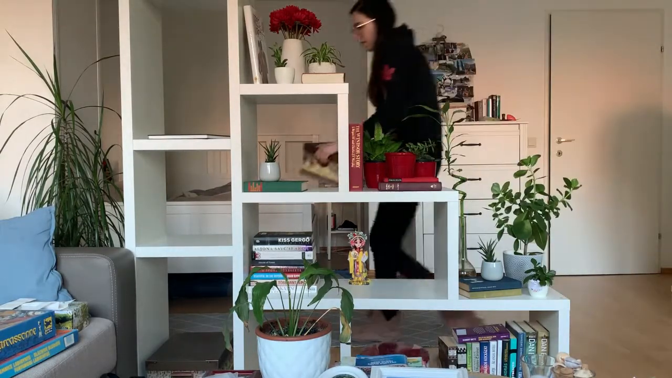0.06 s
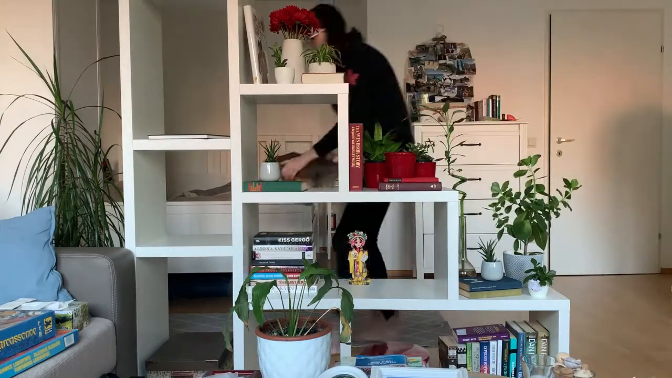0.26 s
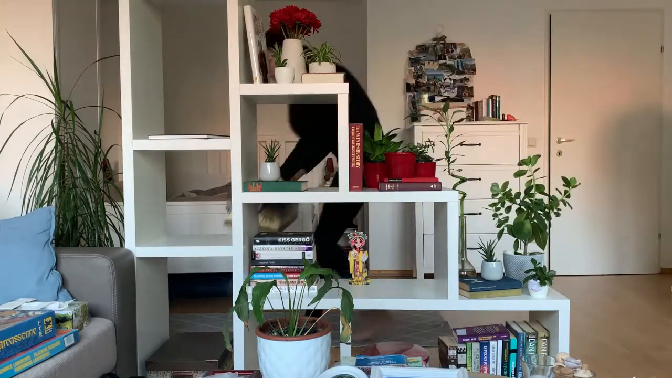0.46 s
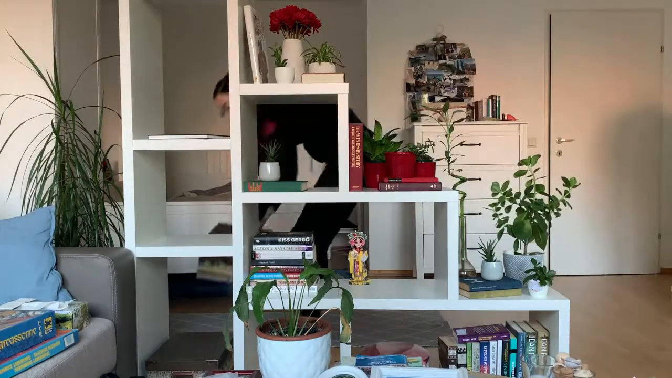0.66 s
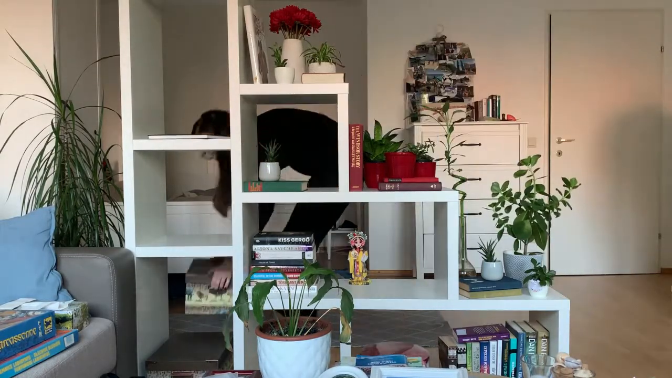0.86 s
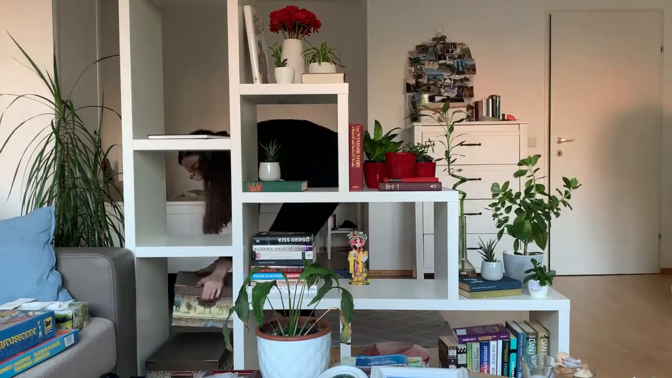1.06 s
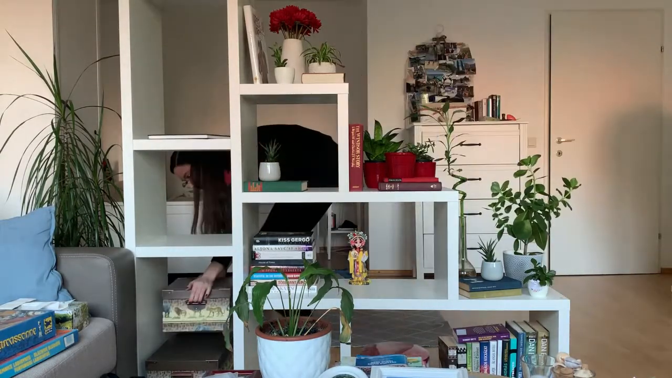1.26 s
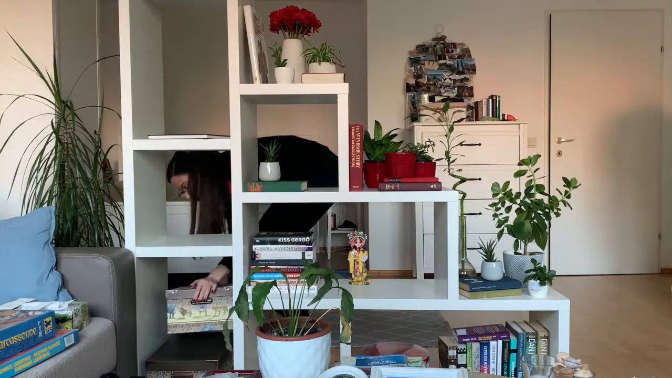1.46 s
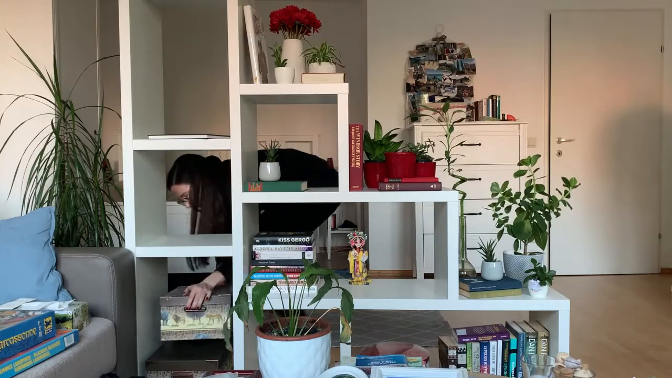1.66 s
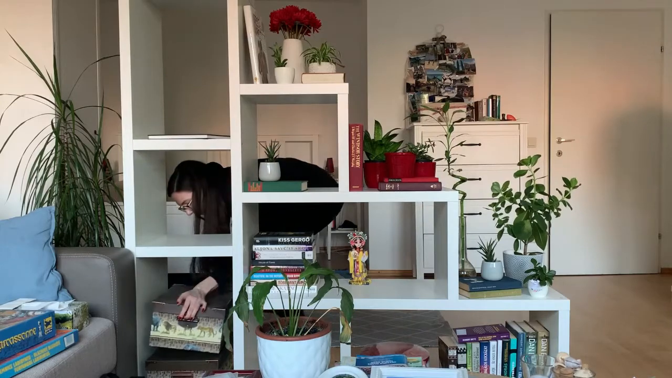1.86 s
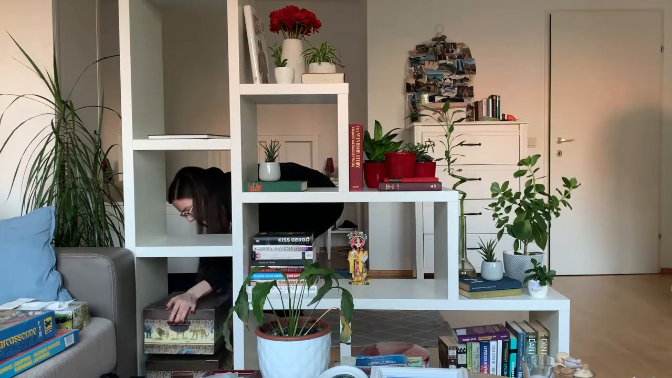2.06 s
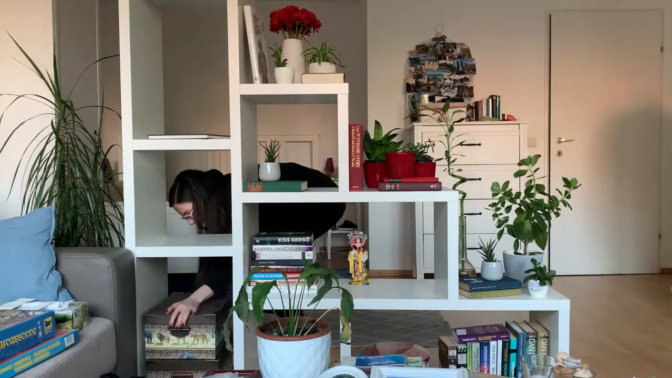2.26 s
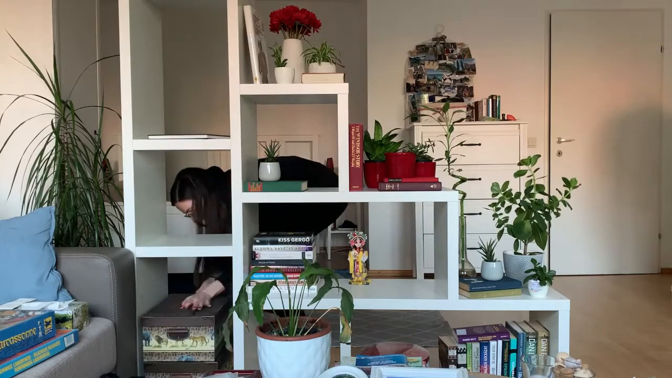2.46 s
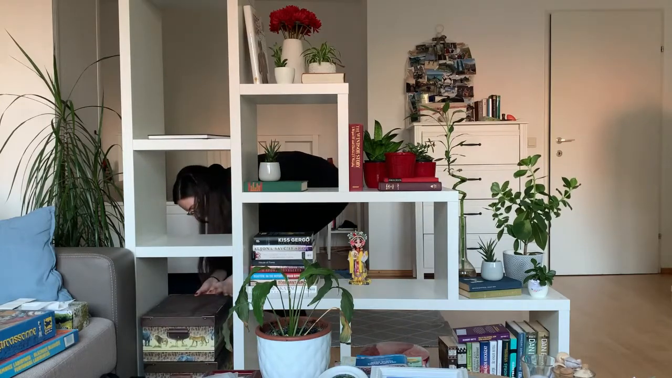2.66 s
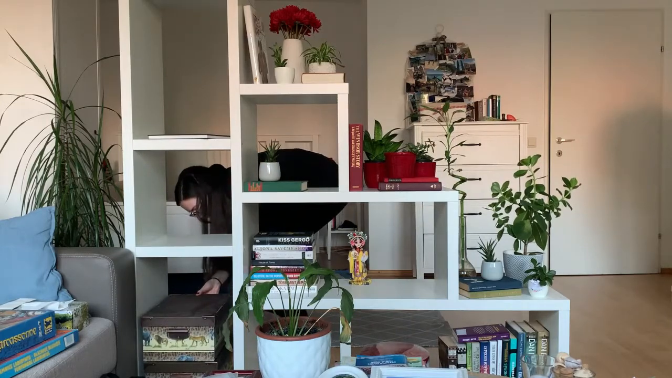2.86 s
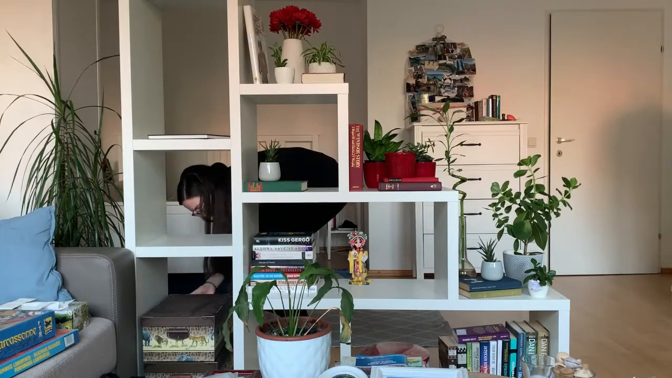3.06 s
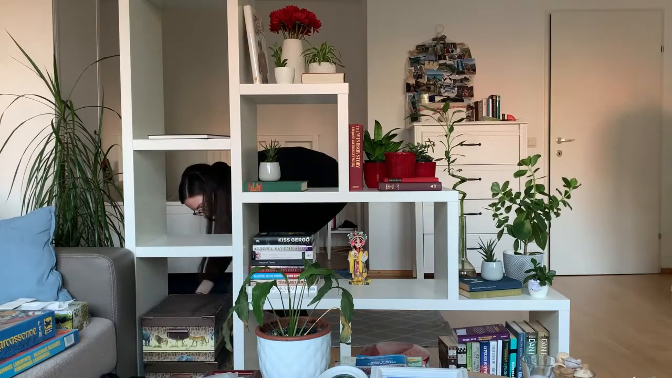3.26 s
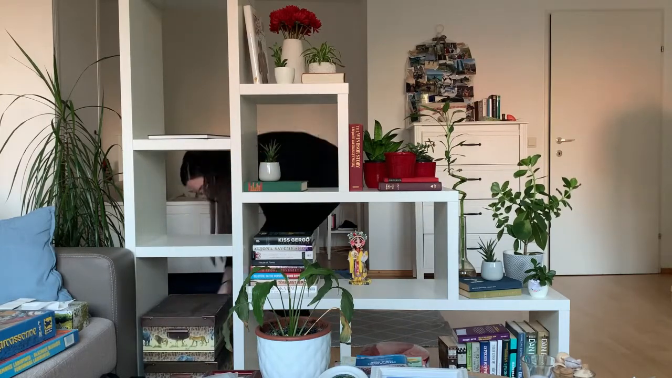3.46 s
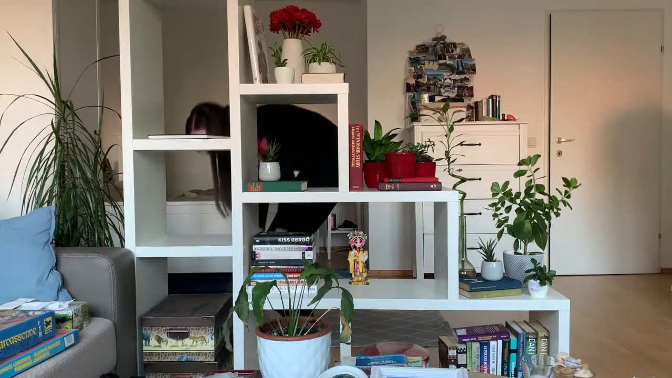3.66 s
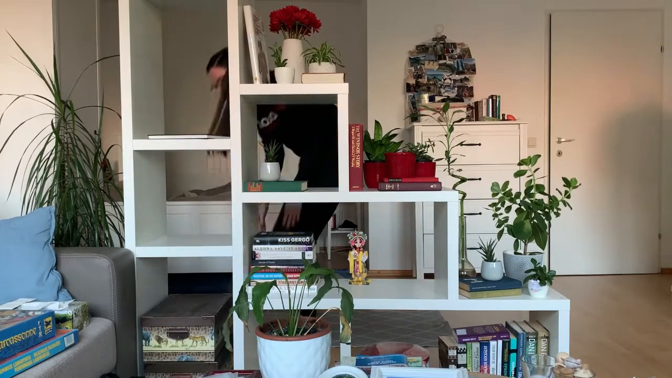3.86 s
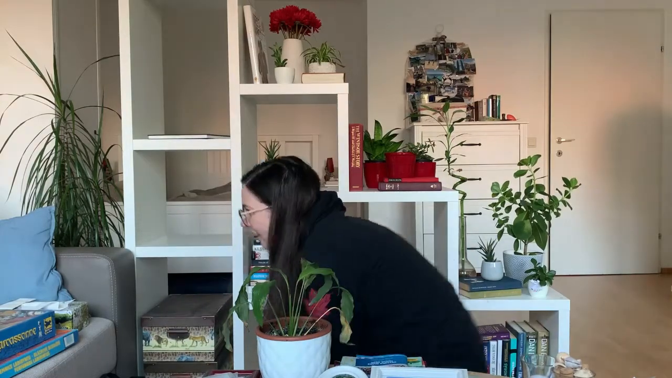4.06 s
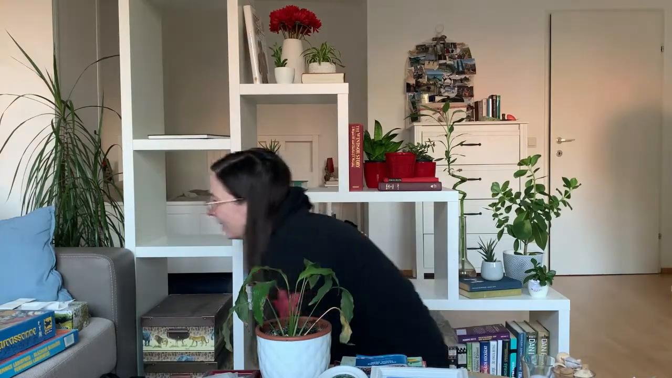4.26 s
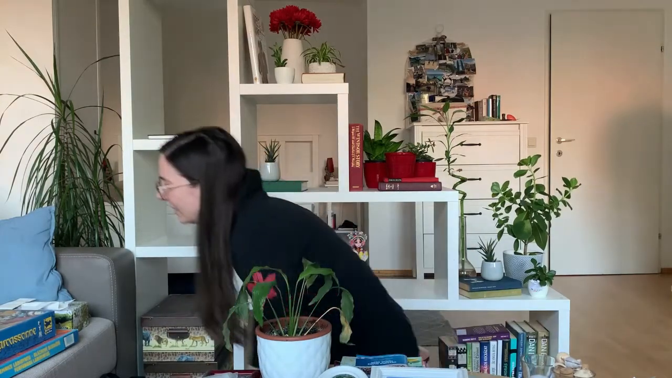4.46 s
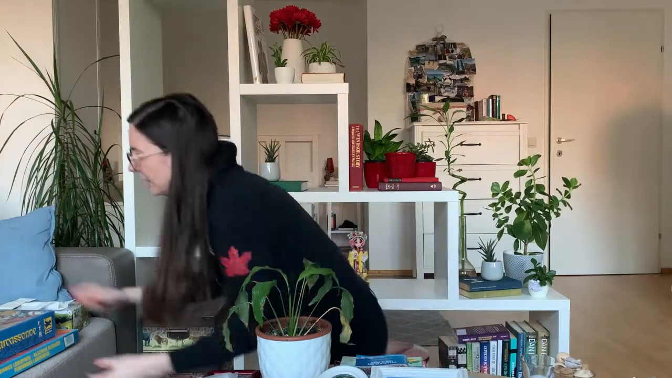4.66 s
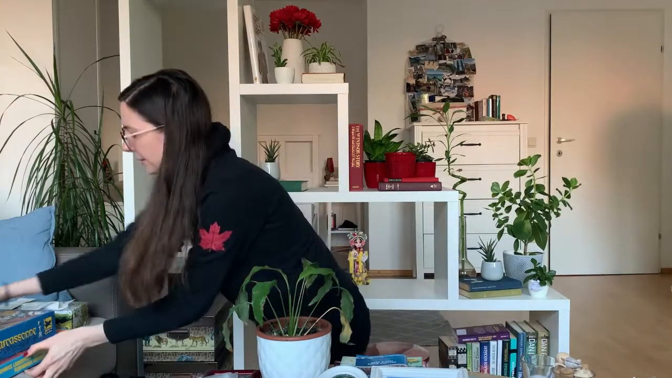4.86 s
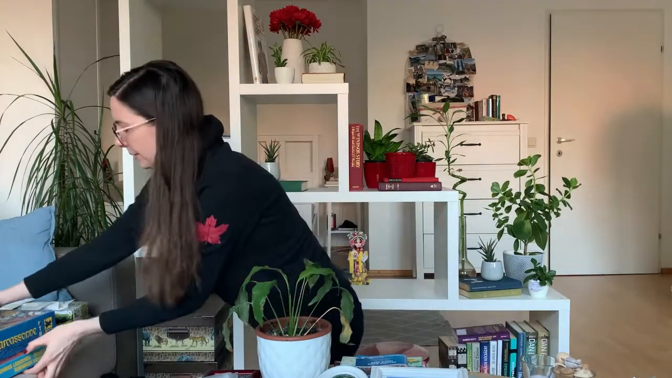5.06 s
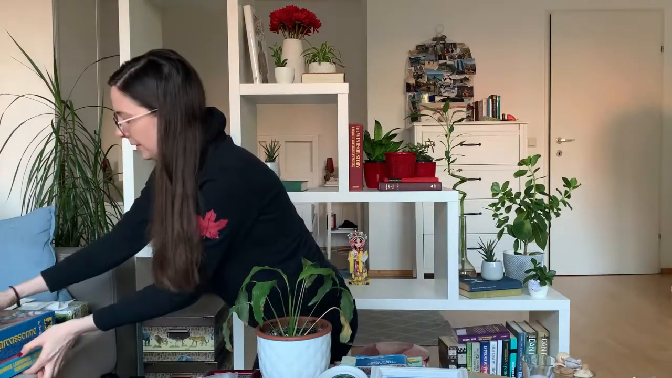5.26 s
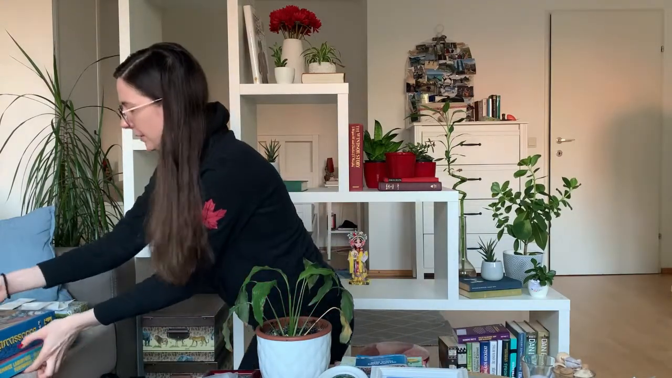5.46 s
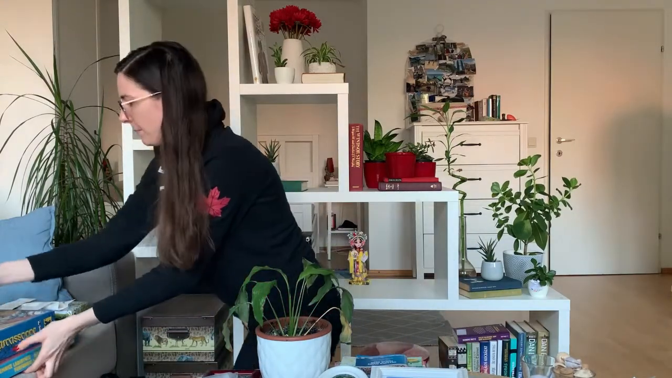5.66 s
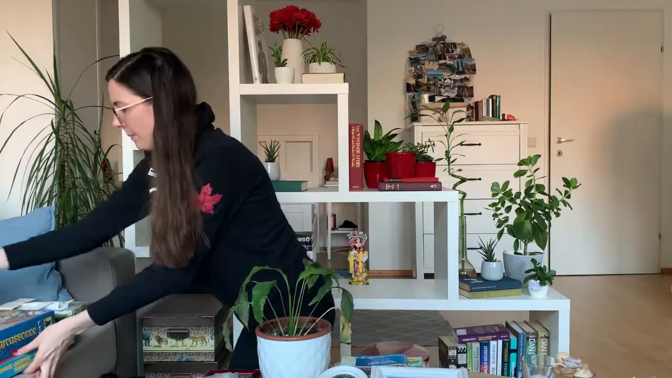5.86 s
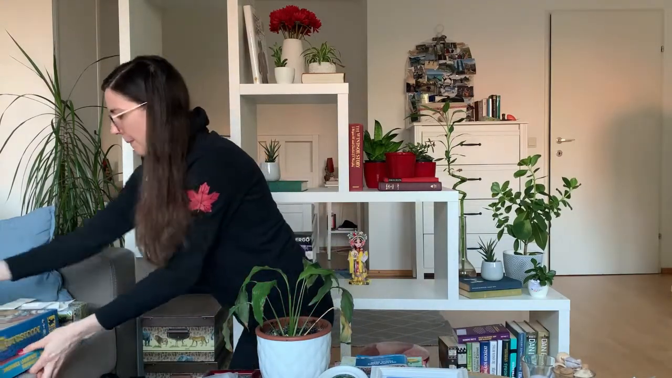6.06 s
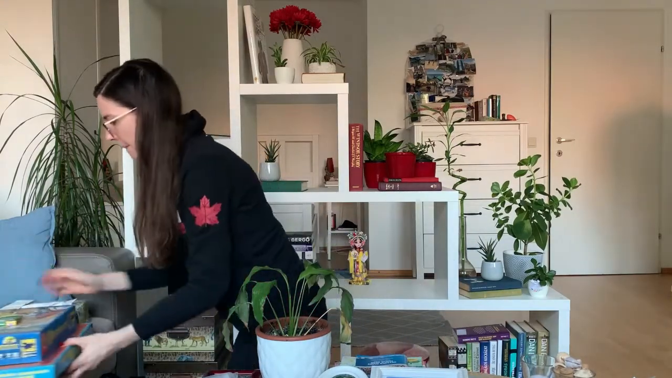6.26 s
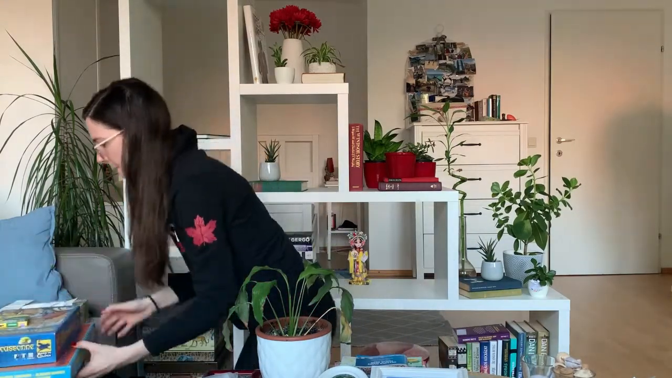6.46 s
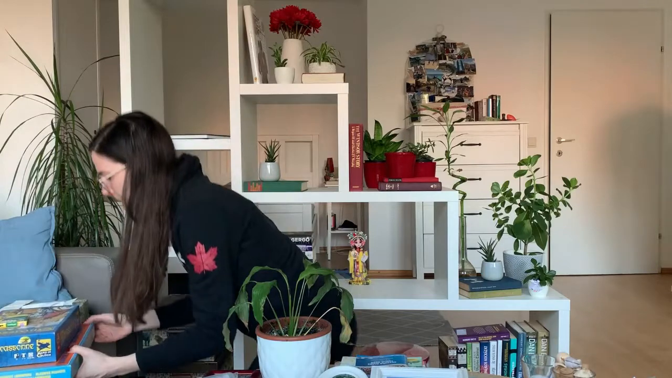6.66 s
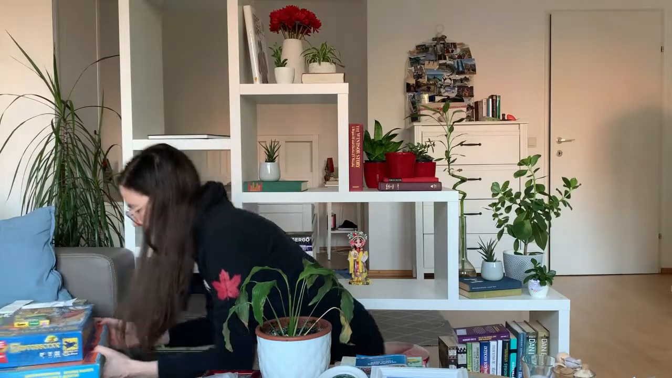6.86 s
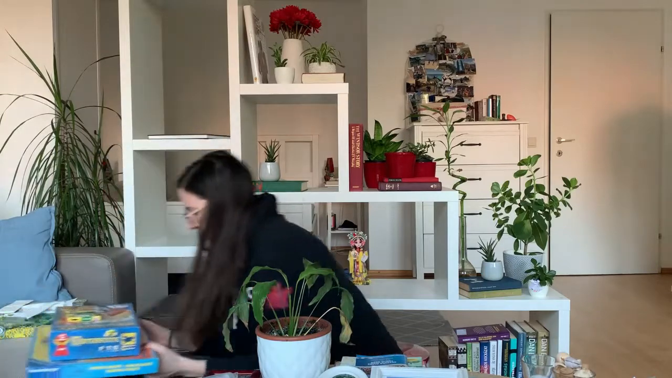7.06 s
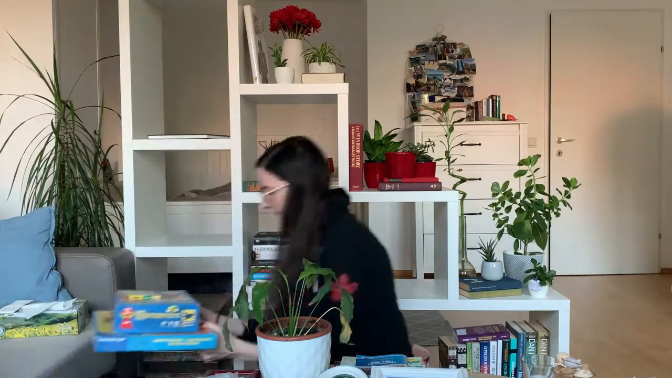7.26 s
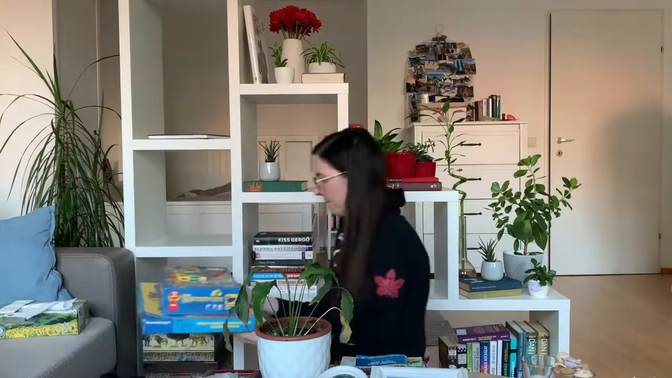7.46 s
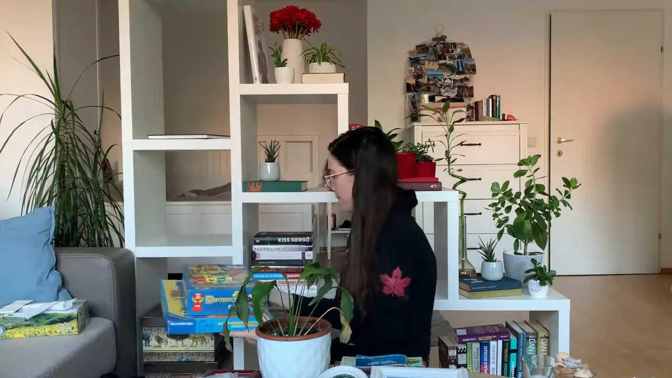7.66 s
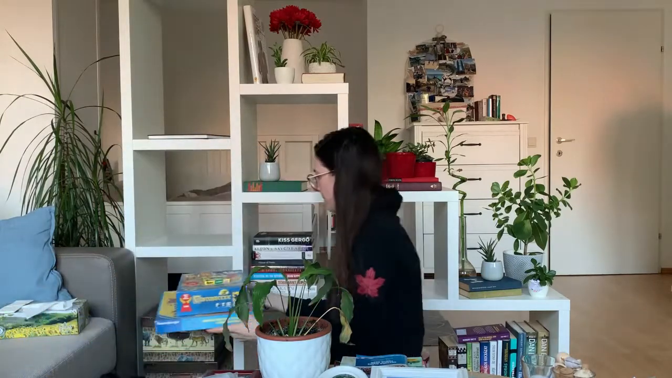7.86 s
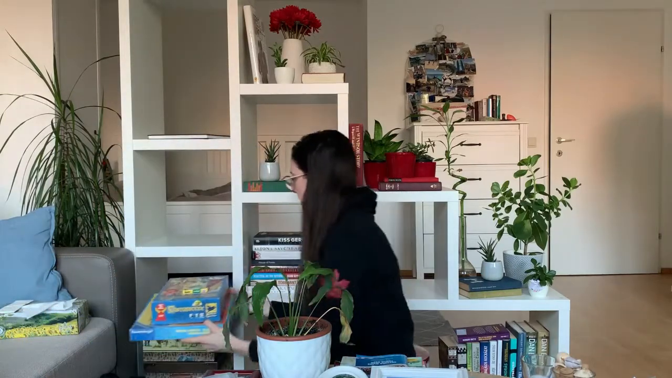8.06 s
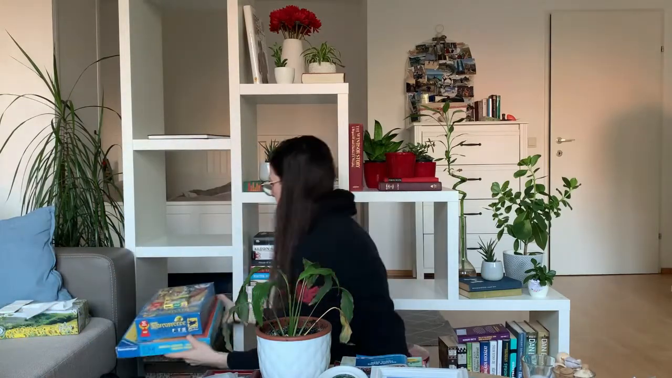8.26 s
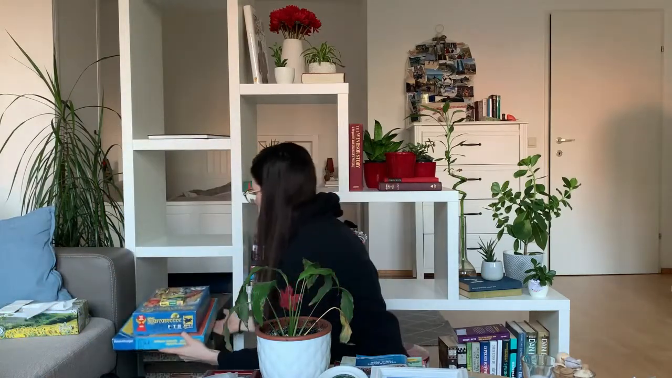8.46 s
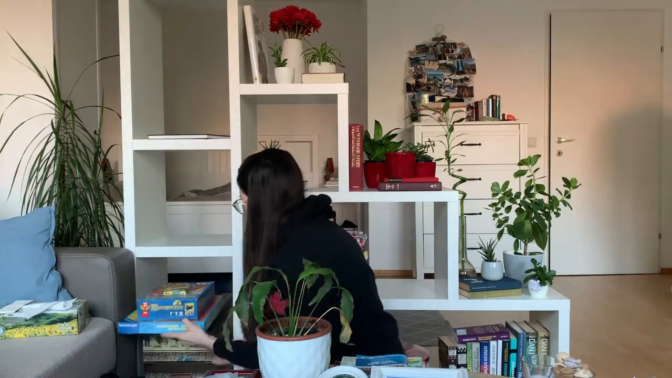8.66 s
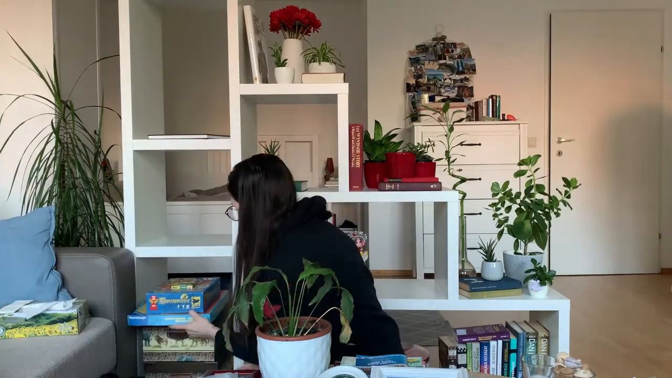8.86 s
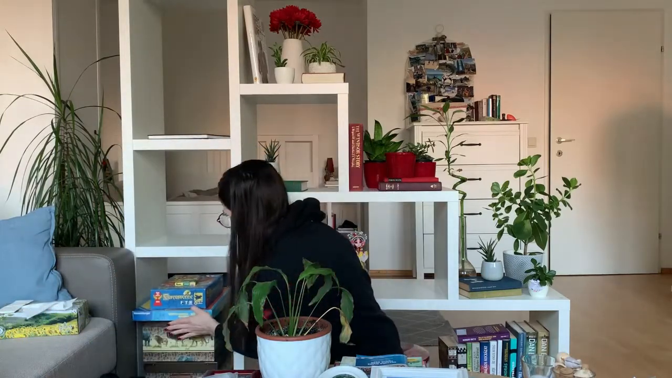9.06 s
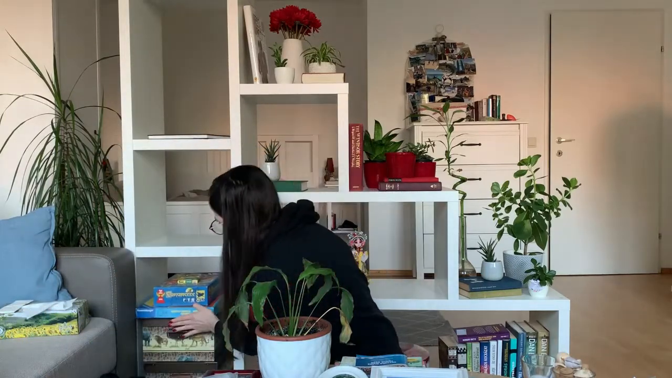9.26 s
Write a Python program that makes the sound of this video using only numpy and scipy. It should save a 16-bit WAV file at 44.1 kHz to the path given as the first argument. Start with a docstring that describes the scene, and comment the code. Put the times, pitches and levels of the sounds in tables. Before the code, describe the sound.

A quiet furnished living room with soft low mains hum, still air and a short natural reverberation, heard in stereo. From 0 to 0.7 s sleeves rustle over a faint floor rumble. At 0.8 s a cardboard box strikes hard with a hollow knock; more thuds follow, with shelf booms near 1.15 and 2.04 s, then knocks and a scraping push at 2.2-2.7 s. A firm thud and rub come at 3.1 s. Light taps and sleeve rustle follow near 3.7-4 s, then sock shuffles and low floor rumble at 4.2-4.6 s. Hands rasp over a lid at 4.7-5.2 s. From 5.5 to 6.3 s boxes rub, knock and groan lightly; at 6.7 s one scrapes off the stack, shifting until 7.7 s. After a lull it scrapes at 8.2 s, lands with a deep boom and brief squeak at 8.44 s, then slides and settles with softer bumps until about 9.2 s.

```python
"""Furnished living room, a low shelf, a small pair of microphones; a low mains hum and still air lie under it all.
First sleeves rustle over a floor rumble; then cardboard game boxes drop on the shelf, which booms, and are pushed in.
Next socks shuffle, hands take hold of a lid, boxes rub and knock, and the top one scrapes off the stack.
Last it is slid on top of the others with more blows and booms. Each blow is an edge tick, then a hollow thud.
Rubbing is filtered random slips; groans and squeaks are resonances kept ringing by slips; the room is fading noise."""
import sys
import numpy as np
from scipy import signal
from scipy.fft import rfft, irfft, next_fast_len
from scipy.io import wavfile

SR = 44100
rng = np.random.default_rng(int(sys.argv[2]) if len(sys.argv) > 2 else 0)


def transcribe(u):
    """Save the signal u as a 16-bit wav file named by the first command-line argument.

    u: samples, shape (n,) or (channels, n), limited to [-1, 1]; the rate is SR.
    q: integer samples, one column per channel.
    """
    v = np.clip(np.atleast_2d(u).T, -1, 1)
    q = np.round(v * 32767).astype(np.int16)
    wavfile.write(sys.argv[1], SR, q)


N = 411012


def from_db(db):
    """Decibels to gain."""
    return 10 ** (np.asarray(db) / 20)


def rms_one(x):
    """Scale to rms 1."""
    return x / np.sqrt(np.mean(x ** 2) + 1e-20)


def at_hz(points, hz):
    """Read a table on a log-frequency axis."""
    points = np.array(points)
    return np.interp(np.log(np.maximum(hz, 1)), np.log(points[:, 0]), points[:, 1])


def band(x, low_hz, high_hz, order=2):
    """Causal band-pass."""
    sos = signal.butter(order, [low_hz, min(high_hz, .48 * SR)], "band", fs=SR, output="sos")
    return signal.sosfilt(sos, x + 1e-18)


def colour(x, gain_at):
    """Filter by a gain given for every frequency."""
    size = next_fast_len(x.shape[-1] + 2048)
    hz = np.arange(size // 2 + 1) * SR / size
    return irfft(rfft(x, size) * gain_at(hz), size)[..., :x.shape[-1]]


def resonance(x, hz, width_hz):
    """Two-pole resonance with gain 1 on top."""
    r = np.exp(-np.pi * abs(width_hz) / SR)
    zeros = np.array([1, 0, -1]) * (1 - r * r) / 2
    poles = [1, -2 * r * np.cos(2 * np.pi * hz / SR), r * r]
    return signal.lfilter(zeros, poles, x + 1e-18)


def drift(knots_per_s):
    """Random values of spread about 1, joined by straight lines."""
    knots = rng.standard_normal(4000)
    return np.interp(np.arange(N) / SR * knots_per_s, np.arange(len(knots)), knots)


CONTACT_SHARE = 0.69   # contact is made and broken over this share of the rise and fall


def level_curve(strokes, column, swell_db):
    """Gain in time: a stroke, half in contact at its start, gains swell_db up to its fastest point and loses it."""
    gain = np.zeros(N)
    for start, rise, fall, *levels_db in strokes:
        rise, fall = abs(rise), abs(fall)
        peak = start + rise
        first, last = max(int((peak - 2 * rise) * SR), 0), min(int((peak + 2 * fall) * SR), N)
        on = np.arange(first, last)
        slowness = np.maximum((peak - on / SR) / rise, (on / SR - peak) / fall)
        touching = np.clip((1 - slowness) / CONTACT_SHARE + .5, 0, 1)
        gain[on] += touching * from_db(levels_db[column - 1] - swell_db * slowness)
    return gain


# Edges of the five bands of a blow, thud, hollow, knock, clack and tick: edge_hz
BLOW_BANDS = [90, 320, 950, 2300, 7000, 16000]


def blow(row, thud_width_hz=68, hollow_width_hz=78, flat_share=0.16, settle_s=0.011, contacts_per_s=1100,
         tick_top_hz=9500):
    """The edge ticks and scuffs, the face lands and drums, and the contents settle in a burst of small contacts."""
    lag_ms, thud_hz, hollow_hz, *levels_db, scuff_db = row
    t = np.arange(SR // 5) / SR
    landing = int(max(lag_ms, 1) * SR / 1000)
    pressure = np.minimum(t / t[landing], 1) * np.exp(-t / settle_s)
    contacts = (rng.random(len(t)) < contacts_per_s / SR) * rng.standard_normal(len(t)) * pressure
    edge, face = from_db(scuff_db + 10.0) * contacts, from_db(scuff_db) * contacts
    edge[0] += 1
    edge[landing] += .8
    face[landing] += 1
    face[0] += .15
    # the soft face rings the box and its air; the hard edge gives the knock, clack and tick above them
    thud = resonance(face, thud_hz, thud_width_hz) + flat_share * face
    hollow = resonance(face, hollow_hz, hollow_width_hz) + flat_share * face
    drives = [thud, hollow, edge, edge, band(edge, 1700, tick_top_hz, order=1)]
    out = np.zeros(len(t))
    for db, drive, low, high in zip(levels_db, drives, BLOW_BANDS, BLOW_BANDS[1:]):
        out += from_db(db) * rms_one(band(drive, low, high, order=3))
    return out


# the clack lies between knock and tick: offset from the edge in dB, share of the crispness
CLACK_DB, CLACK_FOLLOWS = -5.5, 0.36


def edge_levels(edge_db, crisp_db):
    """Knock, clack and tick in dB: crispness moves the tick most."""
    return [edge_db, edge_db + CLACK_DB + CLACK_FOLLOWS * crisp_db, edge_db + crisp_db]


# A box strikes; levels are before blow_db, direct_db is the direct sound against the room:
# start_s, lag_ms (face behind edge), thud_hz, hollow_hz, thud_db, hollow_db, edge_db, crispness_db, direct_db
BOX_BLOWS = [(0.791, 8, 220, 413, -10.5, -10.5, -23, -8, 5),
             (0.885, 2.55, 185, 348, -19, -23.5, -40, -9.5, -1),
             (0.96, 3.3, 205, 490, -22, -27.5, -41, -29, -6),
             (1.143, 3.63, 135, 760, -18, -27.5, -43, -8.5, -4),
             (1.178, 2.7, 135, 390, -27.5, -30.5, -47, -6, 4.5),
             (1.33, 6, 308, 334, -40, -43.5, -56, -17, 6.5), (1.452, 2, 155, 377, -29, -41, -60, -25, -2.5),
             (1.514, 3.5, 246, 398, -31.5, -39, -74, -6, -1),
             (1.877, 14.2, 190, 455, -13, -23, -37, -10, -11.5),
             (2.029, 11.1, 156, 341, -13.5, -16, -32.5, -12.5, -2.5),
             (2.19, 1.94, 176, 344, -28.5, -33, -49, -13, -3),
             (2.302, 5.8, 238, 353, -21.5, -23.5, -35.5, -6, -1),
             (2.3641, 5.37, 213, 330, -20, -23.5, -28, 0, 14),
             (2.543, 2.5, 210, 430, -31.5, -36, -38.5, -1, 6),
             (2.675, 2.3, 159, 362, -27, -31, -50, -28.5, -8),
             (3.094, 5, 257, 510, -13, -28.5, -28.5, -1.5, -1.5),
             (3.123, 2.92, 160, 690, -25.5, -28.5, -37.5, -3, 3),
             (3.941, 2.9, 283, 366, -39, -61, -47.5, -12, -1.5),
             (4.02, 1.5, 252, 720, -56, -48.5, -46.5, -45, 1),
             (4.788, 2.8, 237, 554, -45, -32, -52, -15.5, -1.5),
             (5.136, 1.52, 144, 527, -25.5, -34.5, -48, -3.5, 2),
             (5.482, 3.3, 237, 436, -30, -26.5, -34, -17.5, -3.5),
             (5.599, 8.25, 219, 495, -31, -23.5, -34, -14.5, 8.5),
             (5.652, 2, 300, 500, -48.5, -46, -47, -14, 9.5),
             (5.817, 1.8, 309, 414, -58, -36.5, -45, -30, 5),
             (5.86, 3, 270, 427, -46, -38.5, -54, -17, 1.5),
             (5.938, 2.9, 287, 510, -40, -41.5, -56, -7.5, -5),
             (5.998, 2.4, 277, 420, -34, -35.5, -68.5, -24, 4),
             (6.062, 2.14, 280, 392, -35, -33.5, -46, -15, -6),
             (6.127, 2.1, 194, 410, -31.5, -35.5, -51, -5, -3),
             (6.213, 2.1, 172, 440, -29, -28, -71, -16, 1), (6.744, 2.5, 160, 445, -55, -40, -64, -26, 4),
             (6.897, 2.2, 279, 408, -44.5, -44.5, -68, 2, 8),
             (7.093, 3, 280, 620, -54, -40.5, -60, -25, -1.5),
             (8.35, 2.9, 215, 454, -23, -35, -41.5, -13, 1.5),
             (8.44, 6.2, 127, 404, -8.5, -22.5, -36.5, -0.5, -1.5),
             (8.589, 1.4, 152, 334, -73, -38, -46, -37, 5.5),
             (8.681, 2.6, 133.3, 350, -38.5, -37.5, -55, -1, 2),
             (8.762, 2.1, 144, 354, -35.5, -47, -53, 2, -0.5),
             (9.083, 4.7, 129, 370, -24, -43, -45.5, -16, -3),
             (9.228, 1.9, 142, 384, -32.5, -42, -43, -19, 0.5)]
# Fingers tap a lid; levels are before blow_db: start_s, edge_db, crispness_db
FINGER_TAPS = [(0.216, -58, 17), (2.998, -55, -33), (3.727, -48, -8.5), (3.878, -46.5, -17.5),
               (4.718, -45.5, -30), (4.9, -39.5, -25), (6.182, -46.5, -15), (6.495, -54, 0),
               (6.382, -53, -36), (6.561, -42.5, -15), (6.826, -40.5, -20), (6.935, -56, -7)]
SCUFF_DB, SCUFF_PER_DB = -11.5, -0.47   # scuffing of a blow at 0 dB, its change per dB: lighter blows scuff more
# a blow above this level rocks the box, which lands once more, softer
ROCKS_ABOVE_DB, ROCK_S, ROCK_THUD_DB, ROCK_EDGE_DB = -23, 0.036, -14, -11.5
TAP_LAG_MS, TAP_THUD_HZ, TAP_HOLLOW_HZ = 1.6, 266, 742
TAP_THUD_DB, TAP_HOLLOW_DB = -12, -5   # relative to the edge
TAP_SCUFF_DB, TAP_DIRECT_DB = -16.5, -4


def strikes():
    """Every contact as (s, direct dB, blow): the boxes, their second landings and the finger taps."""
    out = []
    for s, lag_ms, thud_hz, hollow_hz, thud_db, hollow_db, edge_db, crisp_db, direct_db in BOX_BLOWS:
        weight_db = max(thud_db, hollow_db)
        scuff_db = SCUFF_DB + SCUFF_PER_DB * weight_db
        landings = [(0.00013, 0.017, 0.00058)]   # delay s, change of thud and hollow dB, change of edge dB
        if weight_db > ROCKS_ABOVE_DB:
            landings.append((ROCK_S, ROCK_THUD_DB, ROCK_EDGE_DB))
        for delay, body_db, rim_db in landings:
            levels_db = [thud_db + body_db, hollow_db + body_db, *edge_levels(edge_db + rim_db, crisp_db)]
            out.append((s + delay, direct_db, [lag_ms, thud_hz, hollow_hz, *levels_db, scuff_db]))
    for s, edge_db, crisp_db in FINGER_TAPS:
        levels_db = [edge_db + TAP_THUD_DB, edge_db + TAP_HOLLOW_DB, *edge_levels(edge_db, crisp_db)]
        out.append((s, TAP_DIRECT_DB, [TAP_LAG_MS, TAP_THUD_HZ, TAP_HOLLOW_HZ, *levels_db, TAP_SCUFF_DB]))
    return out


# Panels of shelf and lids: pitch_hz, width_hz, level_db (gain of that resonance)
BOARDS = [(140.6, 55, 5), (213, 6.4, 1.5), (251, 36, 2.5), (467, 120, 2.5), (736, 54, -2), (860, 190, 5),
          (996, 110, 4), (1317, 69, 8), (1431, 240, 8.5), (3000, 330, 10.5), (3640, 760, 12.5),
          (4380, 130, 12.5)]


def panels(x):
    """Lids and shelf boards ring briefly with whatever shakes them."""
    return x + sum(resonance(x, hz, width) * (from_db(db) - 1) for hz, width, db in BOARDS)


def boxes(blow_db=-19.5, count=10):
    """Blows take turns at several spots, so the room answers neighbours a little differently."""
    out = np.zeros((2, N + 2 * SR))
    spots = [room_response() for _ in range(count)]
    for k, (s, direct_db, row) in enumerate(strikes()):
        hit = room(panels(blow(row)), direct_db, spots[k % count])
        at = int(s * SR)
        out[:, at:at + hit.shape[1]] += from_db(blow_db) * hit
    return out[:, :N]


# The whole weight of a box comes down on the shelf: start_s, level_db
SHELF_BOOMS = [(1.148, -29), (2.042, -23), (2.29, -34), (8.443, -26.5), (9.089, -32)]
# Lowest modes of the shelf frame: pitch_hz, t60_s, level_db (added to that of the boom)
FRAME_MODES = [(65, 0.7, -6.5), (87.5, 0.25, 5.5)]


def shelf(push_s=0.012):
    """A soft, heavy push sets the frame of the shelf swinging in its lowest modes."""
    t, out = np.arange(SR // 2) / SR, np.zeros(N + SR)
    for s, db in SHELF_BOOMS:
        swing = np.zeros(len(t))
        for hz, t60, mode_db in FRAME_MODES:
            swing += from_db(db + mode_db - 60 * t / t60) * np.sin(2 * np.pi * hz * t)
        at = int(s * SR)
        out[at:at + len(t)] += swing * (1 - np.exp(-t / push_s))
    return out[:N]


def friction(strokes, spectrum, slips_per_s, size_db, judder_db, swell_db, brighten_db, gain_db):
    """Fibres slip at random, in clumps; three bands follow the stroke, bright rasp swelling by brighten_db more."""
    sizes = from_db(size_db * np.minimum(rng.exponential(1, N), 4)) * rng.choice([-1, 1], N)
    slips = (rng.random(N) < slips_per_s / SR) * sizes * from_db(judder_db * drift(45))
    slips = colour(slips, lambda hz: from_db(at_hz(spectrum, hz)))
    edges_hz = [120, 700, 5000, 17000]
    drumming, rasp, hiss = [rms_one(band(slips, low, high, order=3)) for low, high in zip(edges_hz, edges_hz[1:])]
    dull = colour(rasp, lambda hz: np.clip((2200 - hz) / 1000, 0, 1))
    bright = rasp - dull
    out = drumming * level_curve(strokes, 1, swell_db)
    out += dull * level_curve(strokes, 2, swell_db)
    out += bright * level_curve(strokes, 2, swell_db + brighten_db)
    out += hiss * level_curve(strokes, 3, swell_db)
    return from_db(gain_db) * out


# In all friction tables rise is the speeding up and fall the slowing down; levels are before gain_db. # A box
# slides along the shelf, and later over the other boxes: start_s, rise_s, fall_s, drumming_db, rasp_db, hiss_db
BOX_SLIDES = [(0.772, 0.017, 0.011, -47, -45, -60), (2.26, 0.088, 0.19, -31, -41, -42),
              (2.5, 0.1, 0.063, -50, -51, -56.5), (8.32, 0.11, 0.087, -59, -50.5, -52),
              (8.46, 0.021, 0.17, -32.5, -50.5, -53.5), (8.6, 0.094, 0.15, -54, -51.5, -57.5),
              (8.75, 0.096, 0.39, -51, -50.5, -61), (9.07, 0.049, 0.17, -64, -50, -53.5)]
# Spectrum of the slips: pitch_hz, level_db
BOX_SLIDE_COLOUR = [(65, -18), (110, -11), (318, -4.5), (571, -18), (660, -16.5), (796, -15.5),
                    (1110, -21), (1290, -20.5), (1990, -27.5), (6400, -31.5), (8560, -32.5), (10100, -29),
                    (12200, -30), (13300, -24), (16000, -39)]


def slides():
    """Cardboard on board and on other boxes: dense slips with little clumping."""
    return friction(BOX_SLIDES, BOX_SLIDE_COLOUR, slips_per_s=1700, size_db=4.0, judder_db=1.5,
                    swell_db=11.0, brighten_db=-2.0, gain_db=0.5)


# Boxes rub on each other: start_s, rise_s, fall_s, drumming_db, rasp_db, hiss_db
BOX_RUBS = [(1.15, 0.037, 0.04, -26, -34.5, -50), (1.29, 0.095, 0.9, -58.5, -57, -69),
            (2.98, 0.1, 0.031, -38, -41.5, -59.5), (5.52, 0.18, 0.058, -41, -41.5, -60),
            (5.79, 0.052, 0.28, -42.5, -48.5, -66), (6.04, 0.13, 0.12, -44, -49, -61.5),
            (6.3, 0.092, 0.16, -47.5, -47, -81), (7.09, 0.039, 0.05, -48.5, -56.5, -80)]
# Spectrum of the slips: pitch_hz, level_db
BOX_RUB_COLOUR = [(76, -22), (130, 0.5), (156, -7), (215, -4), (394, -10.5), (601, -11.5), (720, -18),
                  (1030, -23.5), (1490, -28.5), (1970, -39.5), (2460, -36), (6470, -45), (8570, -49),
                  (10700, -47), (16000, -52.5)]


def rubs():
    """Cardboard on cardboard: sparse slips in strong clumps."""
    return friction(BOX_RUBS, BOX_RUB_COLOUR, slips_per_s=700, size_db=4.5, judder_db=5.5,
                    swell_db=10.5, brighten_db=0.5, gain_db=-3.0)


# The top box scrapes off the stack, shifts in the hands and meets the shelf:
# start_s, rise_s, fall_s, drumming_db, rasp_db, hiss_db
BOX_SCRAPES = [(6.69, 0.12, 0.16, -39.5, -44, -64), (7.26, 0.12, 0.094, -43.5, -45, -64.5),
               (7.4, 0.055, 0.17, -46.5, -50, -59.5), (7.62, 0.11, 0.058, -45, -45, -56),
               (8.17, 0.095, 0.15, -44, -43.5, -63)]
# Spectrum of the slips: pitch_hz, level_db
BOX_SCRAPE_COLOUR = [(76, -40), (130, 1), (224, -12), (303, 0), (472, -3.5), (720, -8.5), (1010, -4.5),
                     (1150, -14.5), (1350, -8.5), (1970, -20), (2700, -15.5), (7150, -42), (8400, -40),
                     (10800, -36.5), (16000, -42)]


def scrapes():
    """A lifted box scrapes: dense slips whose bright rasp swells more."""
    return friction(BOX_SCRAPES, BOX_SCRAPE_COLOUR, slips_per_s=1500, size_db=4.5, judder_db=2.5,
                    swell_db=7.5, brighten_db=3, gain_db=-5.0)


# Hands slide over a lid and take hold: start_s, rise_s, fall_s, drumming_db, rasp_db, hiss_db
HAND_GRIPS = [(4.714, 0.025, 0.047, -45.5, -37.5, -59), (4.765, 0.026, 0.14, -51, -40.5, -61),
              (4.88, 0.056, 0.12, -45.5, -39, -57.5), (5.04, 0.085, 0.16, -47, -42, -56.5)]
# Spectrum of the slips: pitch_hz, level_db
HAND_GRIP_COLOUR = [(76, -37), (130, 3), (211, -10), (402, -2.5), (481, -10), (565, -4), (680, -11),
                    (824, -1.5), (910, -9), (1020, 4.5), (1150, -3), (1530, 1), (1850, -6.5), (2600, -11.5),
                    (4200, -21.5), (6470, -31), (8570, -38), (11400, -35.5), (16000, -49)]


def grips():
    """Skin on a lid: the rasp brightens strongly with speed."""
    return friction(HAND_GRIPS, HAND_GRIP_COLOUR, slips_per_s=1100, size_db=4.2, judder_db=1.5,
                    swell_db=11.5, brighten_db=6, gain_db=-2.0)


def singing(note_hz, width_hz, slips_per_s):
    """Uneven slips keep a moving resonance ringing."""
    turning = np.exp(2j * np.pi * np.cumsum(note_hz) / SR)
    slips = (rng.random(len(note_hz)) < slips_per_s / SR) * rng.uniform(0.58, 1, len(note_hz))
    decay = np.exp(-np.pi * abs(width_hz) / SR)
    return (turning * signal.lfilter([1], [1, -decay], slips / turning)).imag


# A dragged box judders and groans at its hollow note; levels are before gain_db:
# start_s, rise_s, fall_s, level_db, pitch_hz (at the start)
BOX_GROANS = [(0.0, 0.008, 0.046, -37, 475), (5.605, 0.01, 0.051, -25.5, 516),
              (5.73, 0.032, 0.55, -40.5, 334), (6.0, 0.057, 0.019, -30.5, 365),
              (6.21, 0.0097, 0.07, -26.5, 387), (7.085, 0.048, 0.04, -35.5, 526),
              (7.72, 0.026, 0.029, -42, 497), (8.23, 0.045, 0.053, -32, 452),
              (8.335, 0.021, 0.052, -29.5, 405), (8.66, 0.04, 0.025, -35, 378),
              (9.04, 0.022, 0.033, -32, 364)]
GROAN_SAG_HZ_PER_S = 270


def groan(width_hz=70, slips_per_s=110, swell_db=12, gain_db=-6):
    """The air in a dragged box rings; its note sinks as the box is pressed."""
    t, note_hz = np.arange(N) / SR, BOX_GROANS[0][-1]
    for start, rise, fall, _, hz in BOX_GROANS:
        sagging = hz - GROAN_SAG_HZ_PER_S * np.minimum(t - start, rise + fall)
        note_hz = np.where(t > start, sagging, note_hz)
    tone = rms_one(band(singing(note_hz, width_hz, slips_per_s), 245, 1550))
    return from_db(gain_db) * level_curve(BOX_GROANS, 1, swell_db) * tone


# Dry cardboard sticks, slips and squeaks; levels are before gain_db:
# start_s, rise_s, fall_s, level_db, first_hz, last_hz, width_hz
CARD_SQUEAKS = [(1.29, 0.039, 0.024, -61, 2760, 2690, 35), (1.425, 0.025, 0.041, -49.5, 1520, 1440, 30),
                (2.541, .005, 0.011, -39, 4700, 4500, 400), (2.62, 0.022, 0.094, -63, 4100, 3900, 160),
                (2.72, .07, 0.16, -63, 2200, 2050, 110), (2.76, 0.055, 0.11, -69, 3100, 2930, 200),
                (2.99, .01, 0.085, -49.5, 1370, 1300, 152), (6.56, 0.0062, 0.015, -38.5, 1310, 1250, 200),
                (6.672, .04, 0.034, -43, 716, 1180, 110), (6.93, 0.0055, 0.021, -56, 4330, 4200, 300),
                (8.16, 0.024, .05, -49, 820, 900, 250), (8.435, 0.0086, 0.041, -28, 1060, 720, 25)]


def squeak(slips_per_s=900, swell_db=8, gain_db=-5):
    """Fast slips merge into a thin tone that glides through each squeak; several spots may squeak at once."""
    out = np.zeros(N)
    for row in CARD_SQUEAKS:
        start, rise, fall, _, first_hz, last_hz, width_hz = row
        gain = level_curve([row], 1, swell_db)
        on = np.flatnonzero(gain)
        note_hz = np.interp(on / SR, [start, start + rise + fall], [first_hz, last_hz])
        tone = singing(note_hz, width_hz, slips_per_s)
        out[on] += gain[on] * rms_one(band(tone, first_hz / 2, first_hz * 2))
    return from_db(gain_db) * out


# Sleeves rustle: start_s, rise_s, fall_s, flap_db, swish_db, hiss_db
SLEEVES = [(0.0, 0.00074, 0.067, -38, -41, -46), (0.07, 0.19, 0.1, -48, -49, -44),
           (0.33, 0.08, 0.1, -66.5, -52.5, -64.5), (0.47, 0.023, 0.067, -60, -51, -61.5),
           (0.64, 0.028, 0.13, -48.5, -52, -67), (3.73, 0.011, 0.09, -55.5, -49, -58),
           (3.89, 0.095, 0.12, -46, -62, -74)]
# Spectrum of the slips: pitch_hz, level_db
SLEEVE_COLOUR = [(110, -8.5), (180, -21), (460, -17), (555, -22.5), (610, -22.5), (1370, -7.5), (2070, -11),
                 (3200, -11), (6620, -26), (8140, -29), (8610, -31.5), (9280, -25.5), (11600, -29.5),
                 (16000, -40.5)]


def cloth():
    """Many fine fibre slips merge into a rustle."""
    return friction(SLEEVES, SLEEVE_COLOUR, slips_per_s=8000, size_db=2.0, judder_db=2.5,
                    swell_db=11, brighten_db=-3.0, gain_db=-6.5)


# Socks slide over the floor: start_s, rise_s, fall_s, flap_db, swish_db, hiss_db
SOCKS = [(0.46, 0.021, 0.19, -65, -55.5, -76), (4.2, 0.018, 0.21, -56, -69, -85),
         (4.39, 0.036, 0.21, -50.5, -53, -80)]
# Spectrum of the slips: pitch_hz, level_db
SOCK_COLOUR = [(120, -17.5), (250, -11), (380, 1.5), (560, -11), (780, -7), (980, -4.5), (1150, -13.5),
               (1350, -3), (1750, -2), (2150, -20), (5000, -26.5), (16000, -45.5)]


def shuffles():
    """Soft cloth on the floor: dense slips of nearly even size."""
    return friction(SOCKS, SOCK_COLOUR, slips_per_s=6000, size_db=1.0, judder_db=2.5,
                    swell_db=6.5, brighten_db=1.5, gain_db=-6)


# How alike the two microphones hear diffuse sound: pitch_hz, likeness (1 same, 0 unrelated)
MIC_LIKENESS = [(60, 0.91), (130, 0.71), (290, 0.73), (640, 0.18), (1400, -0.096), (3100, 0.11),
                (7000, 0.0037)]


def stereo_noise(size):
    """Diffuse noise: much alike in both channels in the bass, nearly unrelated in the treble."""
    mid, side = rng.standard_normal((2, size))
    alike = lambda hz: np.clip(at_hz(MIC_LIKENESS, hz), -1, 1)
    shared = colour(mid, lambda hz: np.sqrt(1 + alike(hz)))
    opposed = colour(side, lambda hz: np.sqrt(1 - alike(hz)))
    return shared + opposed * [[1], [-1]]


# How long the furnished room rings: pitch_hz, t60_s
ROOM_DECAY = [(120, 0.65), (300, 0.37), (900, 0.43), (2500, 0.44), (6000, 0.38), (14000, 0.12)]
# How strongly it answers: pitch_hz, level_db
ROOM_LEVEL = [(120, -2), (300, 2.5), (900, 1.5), (3000, 2.5), (12000, 0)]


def room_response(build_up_s=0.00054):
    """Reflections thicken within milliseconds and die soonest in the top treble."""
    t = np.arange(int(.7 * SR)) / SR
    noise, out = stereo_noise(len(t)), 0
    for centre in 62.5 * 2 ** np.arange(9):
        share = lambda hz: np.clip(1 - abs(np.log2((hz + 1) / centre)), 0, 1)
        fade = from_db(-60 * t / at_hz(ROOM_DECAY, centre)) * (1 - np.exp(-t / build_up_s))
        octave = colour(noise, share)
        tail = octave * fade
        even = np.sqrt(2 * np.mean(octave ** 2) / np.sum(tail ** 2))   # undoes the energy lost to the fade
        out = out + tail * even * from_db(at_hz(ROOM_LEVEL, centre))
    return out


def room(source, direct_db, response, lag_s=0.00019):
    """The direct sound reaches the left microphone first, then the right; the room response is added."""
    steps = np.arange(len(source))
    out = signal.fftconvolve(source[None], response, axes=1)
    late = np.interp(steps - lag_s * SR, steps, source)
    out[:, :len(source)] += from_db(direct_db) * np.array([source, late])
    return out


# Mains hum: pitch_hz, level_db (rms, before waver and channel offset)
MAINS_HUM = [(49, -49.5), (98, -46.5)]
# Spectrum of the still air: pitch_hz, level_db (relative)
AIR_COLOUR = [(20, -15), (32, -22), (50, -14), (100, -6.5), (127, -18.5), (160, -25.5), (240, -30.5),
              (400, -38.5), (1370, -44), (1800, -45.5), (7000, -52.5), (11000, -49.5), (16000, -51.5)]
# The floor rumbles under shifting weight: start_s, rise_s, fall_s, level_db (before rumble_db)
FLOOR_RUMBLE = [(0.0, 0.051, 0.46, -40.5), (4.225, 0.035, 0.46, -37)]


def background(air_db=-50, rumble_db=-1, swell_db=10, waver_db=0.5):
    """Hum is wavering sines, air is coloured noise, floor rumble is low noise; all slightly stronger on the right."""
    t, hum = np.arange(N) / SR, 0
    for hz, db in MAINS_HUM:
        hum = hum + np.sqrt(2) * from_db(db + waver_db * drift(4.2)) * np.sin(2 * np.pi * (hz * t + rng.random()))
    air = from_db(air_db) * rms_one(colour(stereo_noise(N), lambda hz: from_db(at_hz(AIR_COLOUR, hz))))
    low = rms_one(band(stereo_noise(N), 14, 61.0, order=3))
    rumble = from_db(rumble_db) * level_curve(FLOOR_RUMBLE, 1, swell_db) * low
    return (hum + air + rumble) * from_db([[-.6], [.6]])


# Lean of everything but the background: pitch_hz, level_db (left minus right)
LEFT_RIGHT = [(120, -1), (260, -2), (520, -0.5), (1000, 2), (2200, 0.6), (6000, -2), (9000, 1)]


def scene():
    """Blows and friction sound into the room, with the shelf's boom added dry, over the background."""
    places = (slides() + groan(), rubs() + squeak(), grips() + shuffles(), cloth() + scrapes())
    rubbing = sum(room(source, direct_db=-0.5, response=room_response())[:, :N] for source in places)
    lean = lambda hz: from_db(at_hz(LEFT_RIGHT, hz) * np.array([[.5], [-.5]]))
    return colour(boxes() + shelf() + rubbing, lean) + background()


def record(dry, shared_above_hz=7400, ceiling=10.0, cutoff_hz=15700):
    """The recorder gives both channels one treble, turned in phase on the right; peaks are rounded and the top
    is cut."""
    top = lambda hz: np.clip((hz - shared_above_hz) / 1500 + .5, 0, 1)
    turn = lambda hz: np.exp(2j * np.pi * (hz - 6200) / 4750)
    own = colour(dry[1], lambda hz: np.sqrt(1 - top(hz) ** 2))
    shared = colour(dry[0], lambda hz: top(hz) * turn(hz))
    rounded = ceiling * np.tanh(np.array([dry[0], own + shared]) / ceiling)
    return signal.sosfilt(signal.ellip(10, .2, 80, cutoff_hz, fs=SR, output="sos"), rounded)


dry = scene()
out = record(dry)
transcribe(out)
```